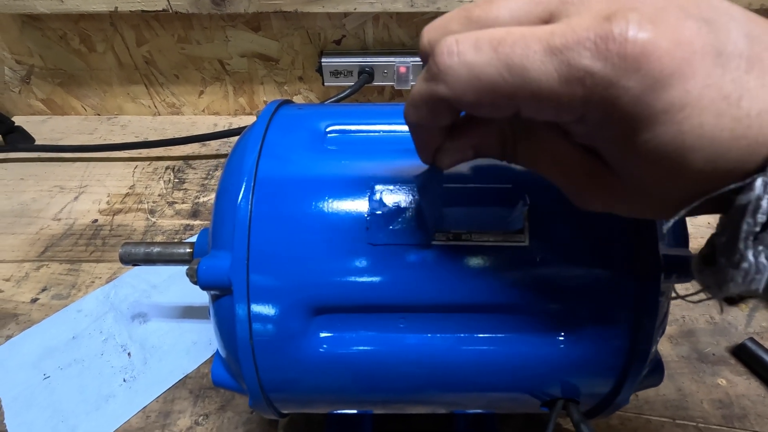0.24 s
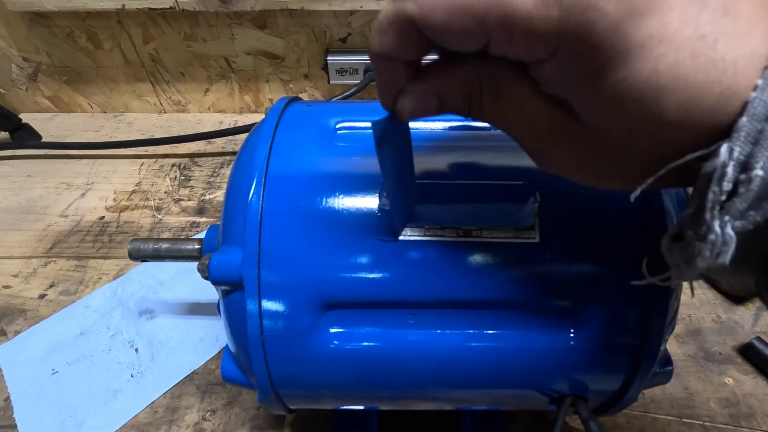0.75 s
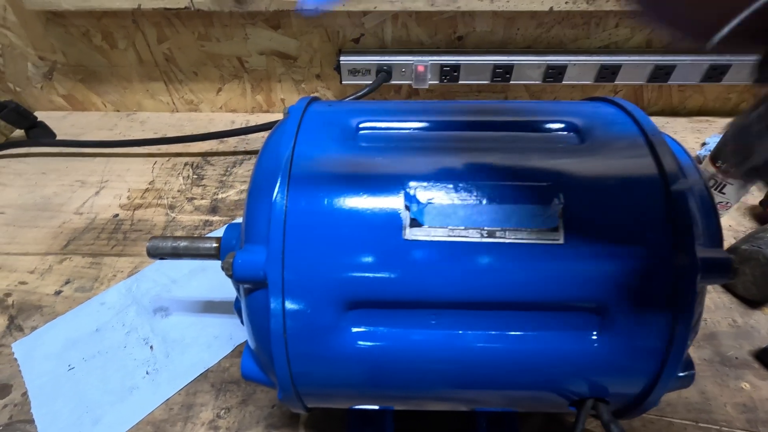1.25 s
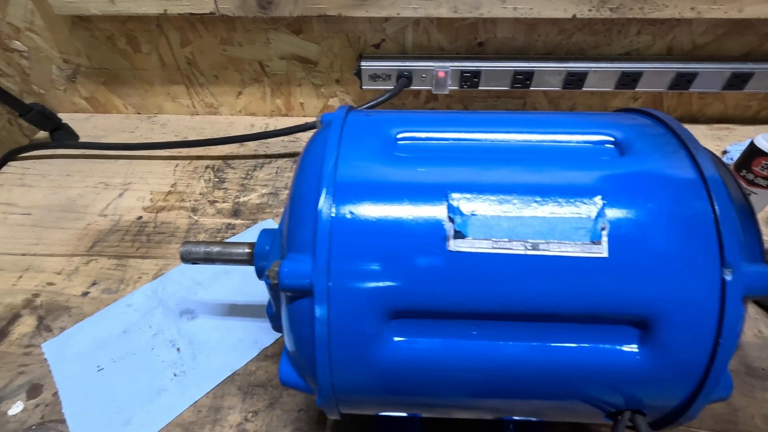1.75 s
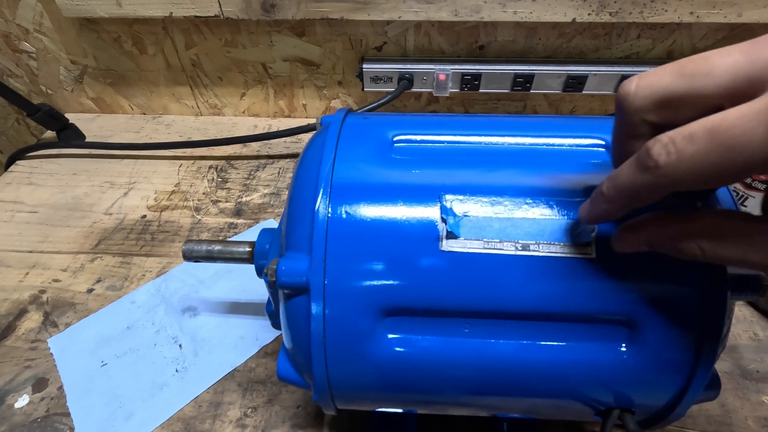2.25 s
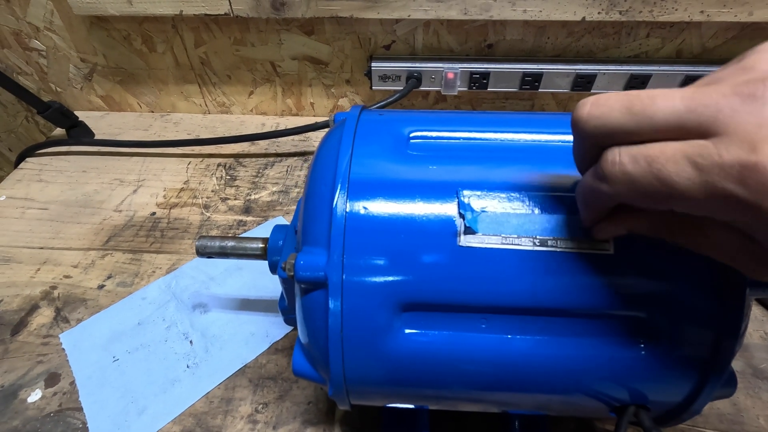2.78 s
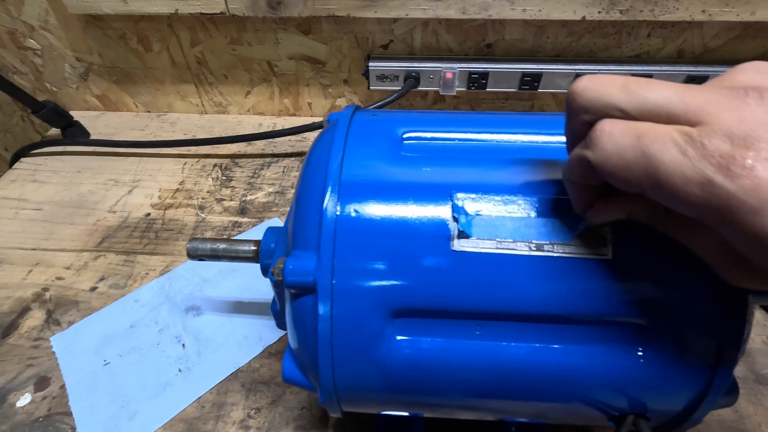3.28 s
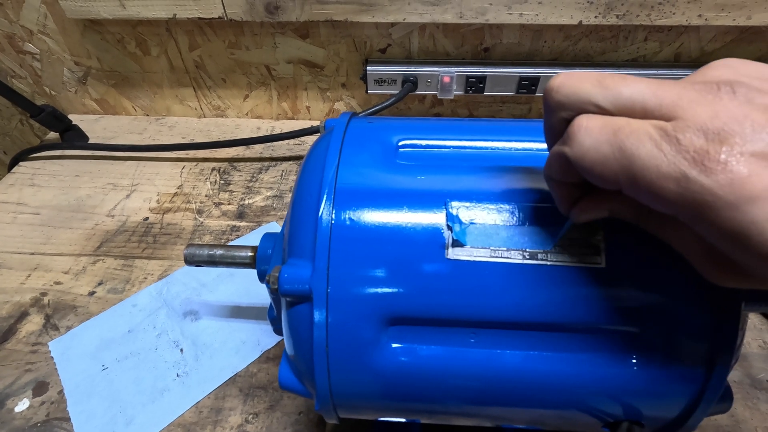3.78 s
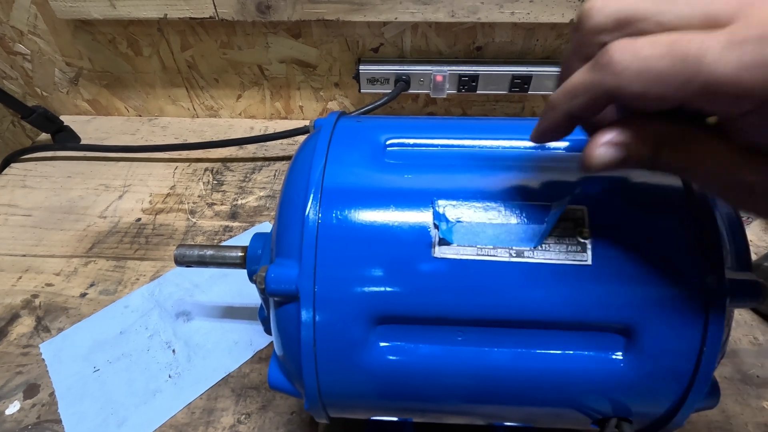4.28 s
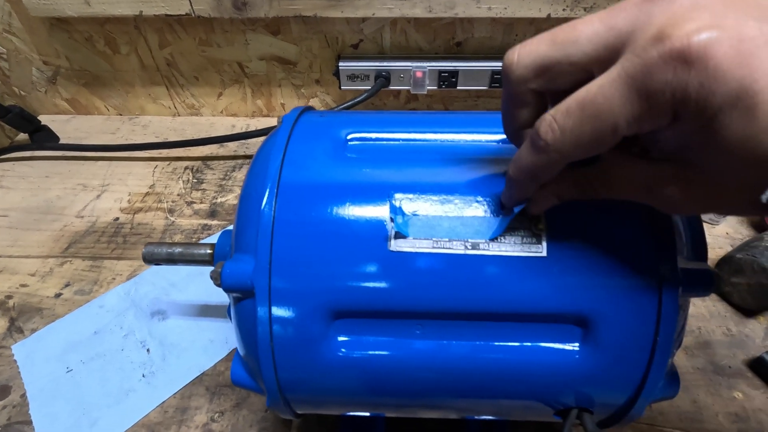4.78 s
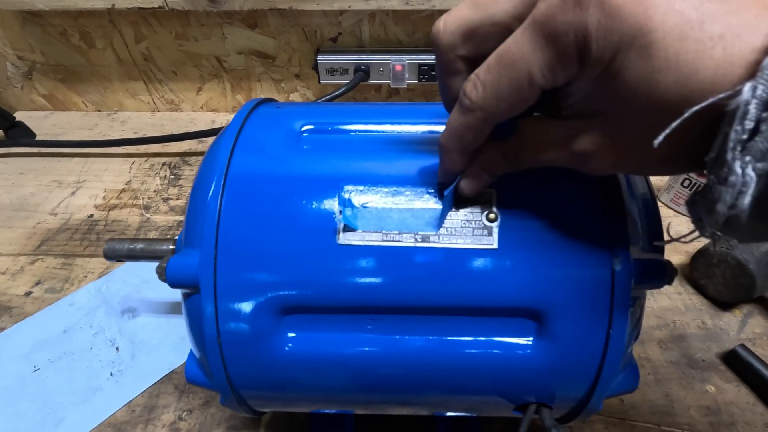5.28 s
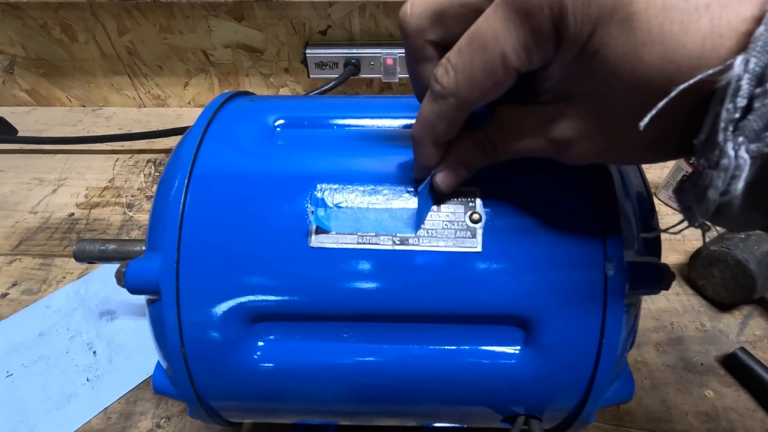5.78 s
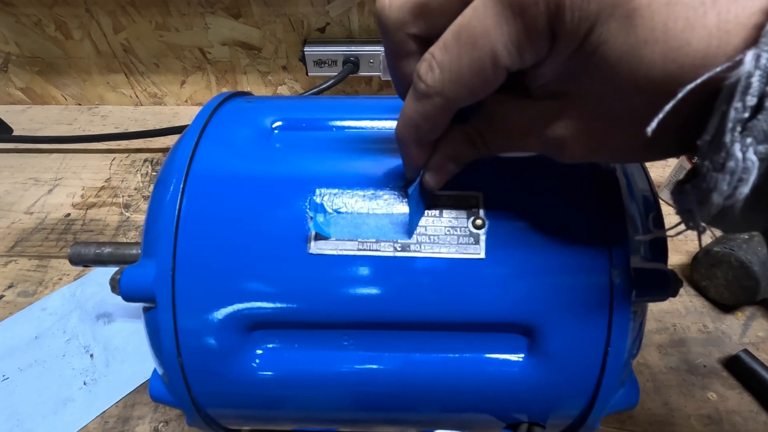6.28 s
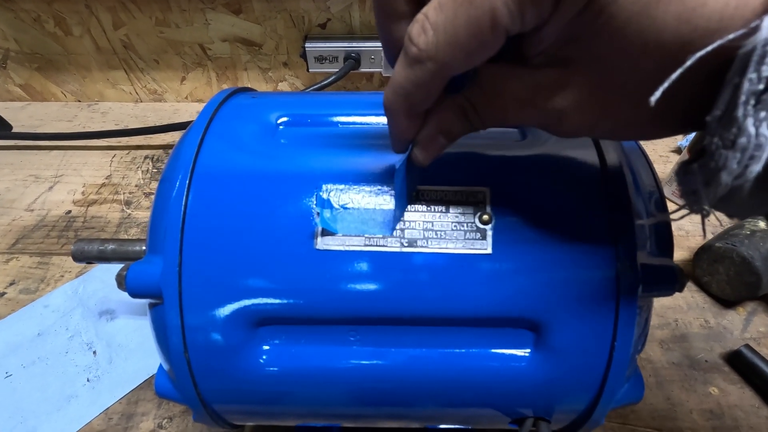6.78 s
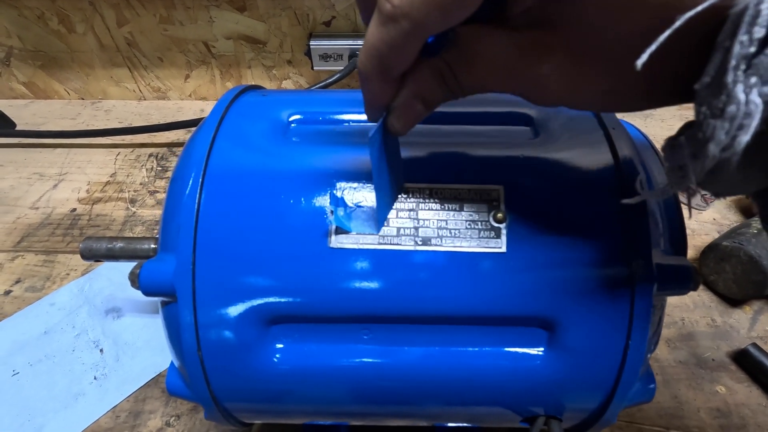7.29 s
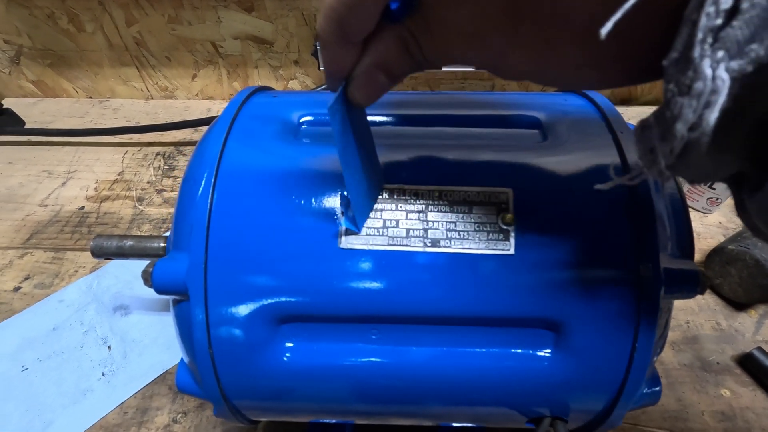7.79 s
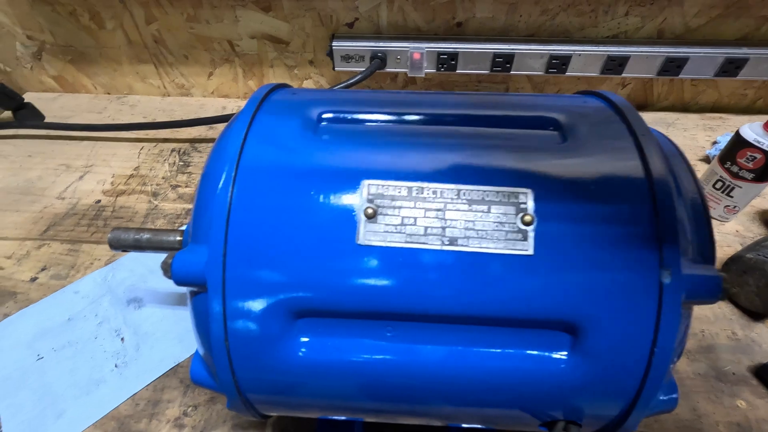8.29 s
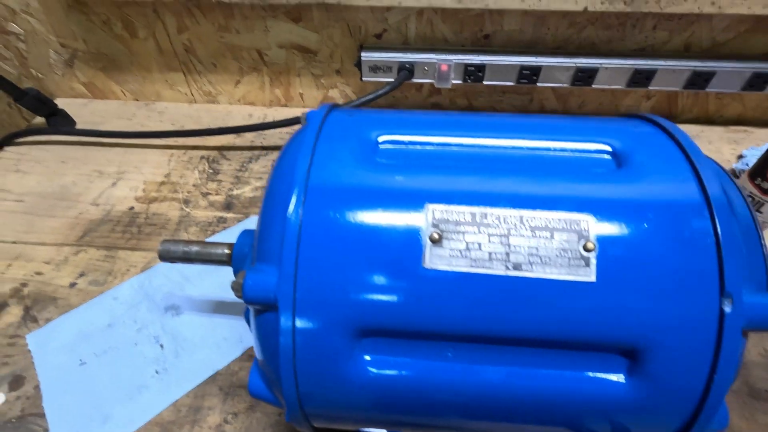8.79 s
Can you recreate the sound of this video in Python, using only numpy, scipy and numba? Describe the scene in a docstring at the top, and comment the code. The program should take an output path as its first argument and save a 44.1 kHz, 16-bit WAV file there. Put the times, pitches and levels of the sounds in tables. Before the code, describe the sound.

Masking tape is removed from a metal plate on a workbench, heard close and nearly without echo. A brief fizzy peel with snaps leads to papery rubbing, then quieter picking whose pitch falls, and a few ticks. A pause holds only soft room air and low hum. Then comes a longer, stronger tearing peel over a deep drone, finished by loud cracks and crisp crushing in the hand.

```python
"""Masking tape comes off a motor's metal nameplate on a workbench, close to the microphone, in a humming workshop.
First a short strip is peeled, snaps and is rubbed in the fingers; then a corner of the next is picked loose.
After a pause comes a long peel across the plate over a deep drone; it ends in snaps and a crumpling in the hand.
Random clicks of breaking glue ring the strip's moving resonances; snaps are cracks with short damped notes;
thuds are bending low notes; the workshop is coloured noise, a wavering hum and a rough drone."""
import sys
import numpy as np
from scipy import signal
from scipy.fft import rfft, irfft
from scipy.io import wavfile
from scipy.ndimage import uniform_filter1d, map_coordinates
from numba import njit

SR = 44100
rng = np.random.default_rng(int(sys.argv[2]) if len(sys.argv) > 2 else 0)


def file_out(sig):
    """Save sig as 16-bit WAV at sys.argv[1]."""
    # one column per channel
    cols = np.atleast_2d(sig).T
    # limit, then scale
    lim = np.clip(cols, -1, 1)
    pcm = np.round(lim * 32767).astype(np.int16)
    wavfile.write(sys.argv[1], SR, pcm)


N = 399105  # samples

# colour of one pop of glue: [f/Hz, level/dB]
POP_COLOUR = [(60, -27), (250, -1.5), (600, -3), (2500, 4.5), (5600, 2.5), (7200, -2), (8000, -8.5),
              (10000, -5.5), (11300, -6), (13000, -17), (14500, -36), (16000, -87)]
GLUE_POPS_PER_S = 2400  # in a steady peel

# courses of the three peels: [t/s, pull/dB, strip resonance f/Hz, ring/dB, upper resonance f/Hz]
# the first strip comes off
FIRST_PEEL = [(0, -44, 3000, 18, 6800), (.13, -45.5, 2970, 2, 6800), (.21, -47, 4400, 9, 6540),
              (.46, -44.5, 4250, 8.5, 6900), (.62, -55.5, 4030, -5, 7100), (.92, -48.5, 3380, 10, 5730),
              (1.05, -41, 3200, -9, 5400)]
# a corner of the next strip is picked loose; its resonance falls as it grows
PICKING = [(2.94, -60, 4400, 14, 5700), (3.13, -53.5, 4460, 14, 5200), (3.28, -58.5, 4050, 12, 4970),
           (3.48, -50, 3230, 6, 4450), (3.56, -47.5, 2900, 3, 4930), (3.69, -50, 2160, 8, 5400),
           (3.82, -52, 1430, -5, 5500), (3.92, -48.5, 1270, -17, 5500), (4.02, -47, 1190, -22, 5560)]
# the long peel across the plate
LONG_PEEL = [(6.09, -53, 3500, 6, 7700), (6.3, -49, 3700, 5, 8000), (6.68, -46.5, 3000, 4, 4730),
             (6.97, -44.5, 3800, 5, 4530), (7.48, -43.5, 3920, 8.5, 6700), (7.54, -49.5, 4200, 8, 6550),
             (8.03, -45, 3070, -29, 6700)]


def gain_of(db):
    """Amplitude factor of a level in dB."""
    return 10 ** (np.asarray(db) / 20)


def evened(x):
    """The sound scaled to an RMS of one."""
    return x / np.sqrt(np.mean(x ** 2) + 1e-20)


def read(points, hz):
    """A curve over frequency, read between its points on a logarithmic axis."""
    f, value = np.transpose(points)
    return np.interp(np.log(hz + 1), np.log(f + 1), value)


def follow(rows):
    """Every column of a curve over time, sample by sample."""
    s, *columns = np.transpose(rows)
    return [np.interp(np.arange(N) / SR, s, c) for c in columns]


def add(mix, s, sound):
    """Lays a sound into the mix from s seconds on."""
    part = mix[max(round(s * SR), 0):][:len(sound)]
    part += sound[:len(part)]


def drift(hz, size=N):
    """Smooth random wander of unit RMS, its changes fading out above hz."""
    f = np.fft.rfftfreq(size, 1 / SR)
    spectrum = rfft(rng.standard_normal(size))
    return evened(irfft(spectrum / (1 + (f / hz) ** 4), size))


def colour(x, points, size=2048):
    """A causal filter with the given spectrum, so that clicks keep their sharp front."""
    log_gain = np.log(gain_of(read(points, abs(np.fft.fftfreq(size, 1 / SR)))))
    minimum_phase = np.exp(np.conj(signal.hilbert(log_gain)))
    taps = np.fft.ifft(minimum_phase).real
    return signal.oaconvolve(x, taps)[:len(x)]


@njit
def two_pole(x, hz, damping):
    """A mass on a spring with moving tuning: the parts below, at and above its resonance."""
    out, s1, s2 = np.zeros((3, len(x))), 0., 0.
    for i in range(len(x)):
        g = np.tan(np.pi * hz[i] / SR)
        high = (x[i] - (damping + g) * s1 - s2) / (1 + g * (g + damping))
        band = g * high + s1
        low = g * band + s2
        s1, s2 = g * high + band, g * band + low
        out[0, i], out[1, i], out[2, i] = low, band, high
    return out


def away(t, start, end, rise_s, release_s):
    """Zero from start to end; outside, the number of rise or release times away."""
    return np.maximum(start - t, 0) / rise_s + np.maximum(t - end, 0) / release_s


def workshop(air_db=-57.5, air_swell_db=1.1, air_swell_hz=5, shaft_hz=28.4, waver=0.28,
             drone_hz=64, drone_damping=0.86):
    """Gently swelling coloured air, the wavering hum of a distant machine and a deep, rough drone."""
    # spectrum of the workshop air: [f/Hz, level per Hz/dB]
    air_colour = [(30, -22), (70, -6), (110, -5), (170, 6), (270, -1), (600, 1), (1200, -3), (2200, -8),
                  (4000, -12.5), (7000, -18), (8500, -31.5), (12000, -28.5), (15000, -74)]
    # partials of the hum: [multiple of the shaft speed, level/dB]
    hum_partials = [(3, -10.5), (4, -2), (5, 8)]
    # swell of the hum: [t/s, level/dB]
    hum_level = [(0, -70.5), (3.7, -68), (4.2, -59.5), (5.1, -66.5), (5.32, -58), (5.85, -64.5),
                 (6.15, -69.5), (9.05, -67.5)]
    # drone that swells under the long peel: [t/s, level/dB]
    drone_level = [(5.7, -91), (6.2, -72), (7.75, -65), (8, -80)]
    hiss = evened(colour(rng.standard_normal(N), air_colour))
    air = gain_of(air_db + air_swell_db * drift(air_swell_hz)) * hiss
    turns = np.cumsum(shaft_hz * (1 + 0.0091 * drift(hz=3.4))) / SR
    hum = np.zeros(N)
    for multiple, db in hum_partials:
        hum += gain_of(db) * (1 + waver * drift(hz=5.8)) * np.sin(2 * np.pi * multiple * turns)
    drone = evened(two_pole(drift(hz=2 * drone_hz), np.full(N, float(drone_hz)), drone_damping)[2])
    return air + gain_of(follow(hum_level)[0]) * evened(hum) + gain_of(follow(drone_level)[0]) * drone


def room(x, gap_s=0.005):
    """Scattered echoes from bench and walls, each band dying at its own speed."""
    # time for the echoes to fall by 60 dB: [f/Hz, t60/s]
    decay = [(3000, 0.081), (14000, 0.025)]
    hz, t, z = signal.stft(rng.standard_normal(SR // 2), SR, nperseg=256)
    fading = z * gain_of(-60 * t / read(decay, hz)[:, None])
    tail = signal.istft(fading, SR, nperseg=256)[1]
    tail *= 1 - np.exp(-(np.arange(len(tail)) / SR / gap_s) ** 2)  # the echoes build up gradually
    return signal.fftconvolve(x, tail / np.linalg.norm(tail))[:N]


def thuds(knock_s=0.055, sag=0.206, rise_share=0.029, lowest_hz=150):
    """Low notes that bend with the tension; the shorter they are, the more they turn into a broad knock."""
    # jerks and finger bumps that drum the taut tape and the housing: [t/s, level/dB, f/Hz, t60/s]
    bumps = [(.752, -49, 260, .5), (.803, -38, 265, 0.2), (.874, -35, 242, 0.13), (1.058, -35, 224, 0.094),
             (1.682, -43, 260, 0.084), (2.035, -37, 260, 0.042), (2.045, -49.5, 302, 0.5),
             (4.204, -44, 247, 0.052), (8.037, -39.5, 310, 0.12), (8.066, -31.5, 310, 0.053),
             (8.257, -35.5, 290, 0.036), (8.593, -38.5, 393, 0.2), (8.612, -35.5, 293, 0.13),
             (8.69, -38, 260, 0.11), (8.742, -41, 290, 0.095), (9.022, -39.5, 272, 0.1)]
    out, t = np.zeros(N), np.arange(SR // 2) / SR
    for s, db, hz, t60 in bumps:
        pitch = hz * np.exp(-sag * np.minimum(t / t60, 1))
        rough = min((knock_s / t60) ** 0.87, 1)
        knock = evened(two_pole(rng.standard_normal(len(t)), pitch, rough)[1])
        tone = np.sin(2 * np.pi * np.cumsum(pitch) / SR)
        note = np.sqrt(1 - rough) * tone + np.sqrt(rough) * knock
        add(out, s, gain_of(db - 60 * t / t60) * (1 - np.exp(-t / (rise_share * t60))) * note)
    # too small a surface to move deep bass
    return signal.sosfilt(signal.butter(4, lowest_hz, "high", fs=SR, output="sos"), out)


def pops(per_s, spread_db, top):
    """Clicks at random moments: many small, a few large."""
    n = len(per_s)
    size = gain_of(spread_db * np.minimum(rng.exponential(1, n), top)) / np.sqrt(per_s)
    struck = rng.choice([-1., 1.], n) * (rng.random(n) < per_s / SR)
    return evened(size * struck)


def crackle(pull_db, full_per_s, hz, ring_db, body_db, sparkle_db, upper_hz, fizz_db,
            clump_db=2.5, sparkle_hz=7200, damping=0.96, ring_damping=0.14, upper_db=-5, upper_damping=0.44):
    """Threads of glue break in clumps and ring the free strip at its moving resonance."""
    n = len(pull_db)
    # gentle picking breaks the threads one by one
    per_s = full_per_s * gain_of(np.clip(pull_db + 44.5, -26, 0)) ** 1.3
    clumps = gain_of(clump_db * drift(hz=113, size=n))

    def breaking():
        """Pops over a smooth fizz, coloured like glue letting go."""
        fizz = gain_of(fizz_db) * rng.standard_normal(n)
        return colour(clumps * (pops(per_s, spread_db=2.5, top=4.1) + fizz), POP_COLOUR)

    drive, under = breaking(), breaking()
    # the strip hardly radiates below its resonance
    sheet = two_pole(two_pole(drive, hz, damping)[2], hz, damping)[2]
    ring = gain_of(ring_db) * ring_damping * two_pole(drive, hz, ring_damping)[1]
    upper = gain_of(upper_db) * upper_damping * two_pole(sheet, upper_hz * np.ones(n), upper_damping)[1]
    body = gain_of(body_db) * two_pole(under, hz, np.sqrt(2))[0]  # the duller rasp of what lies beneath
    strip = sheet - ring + upper + body
    dull = signal.sosfiltfilt(signal.butter(3, min(sparkle_hz, SR / 3), fs=SR, output="sos"), strip)
    strip = dull + gain_of(sparkle_db) * (strip - dull)
    power = uniform_filter1d(strip ** 2, size=2600)  # the pull sets how much energy is set free
    return gain_of(pull_db) * strip / np.sqrt(abs(power) + 1e-12)


def rustles(upper_hz=5400, base_fizz_db=7.5, stiffen_octaves=0.14):
    """Each squeeze of loose tape swells and dies; stiffening lifts its resonance, dense pops blur into fizz."""
    # fingers rub, crease or crush the loose tape; rise and release span 20 dB:
    # [peak t/s, level/dB, rise/s, release/s, resonance f/Hz, ring/dB, body/dB, sparkle/dB, pops per s]
    squeezes = [(.77, -42, 0.1, 0.18, 3480, 19.5, 12.5, 12.5, 790),
                (0.886, -36.5, 0.021, 0.043, 3530, -6, 1, 9, 3400),
                (1.063, -43.5, 0.1, 0.027, 3180, -9, -5, 5, 1700),
                (1.29, -49.5, 0.22, 0.51, 2710, -26, 6, -1, 4200),
                (1.59, -41.5, 0.065, 0.11, 2200, 9, 0, 5, 540),
                (1.74, -39, 0.061, 0.047, 2220, 26, -6, 14, 660),
                (1.871, -35, 0.09, 0.12, 2980, 19, -4, 7.5, 1050),
                (2.025, -45.5, 0.14, 0.14, 2760, 7, 7, -1, 3500),
                (3.0, -48.5, 0.18, 0.1, 4100, 11, 10.5, 10, 1800),
                (4.212, -42, 0.043, 0.035, 890, -4, 22, 5, 2700),
                (4.24, -54.5, 0.039, 0.27, 2500, 17, 17, 4, 5000),
                (4.36, -41, 0.03, 0.019, 2720, 5, 8, 7.5, 2000),
                (4.455, -49, 0.064, 0.17, 2480, 17, 9, 11, 890),
                (8.06, -36.5, 0.055, 0.081, 2730, -23, 2, 2, 2400),
                (8.29, -45, 0.19, 0.27, 2300, -24, 8, -0.5, 3600),
                (8.447, -31.5, 0.023, 0.066, 3740, 6, 1, 7, 6100),
                (8.54, -38, 0.062, 0.071, 3050, 5, 3, 1, 4400),
                (8.598, -26, 0.033, 0.057, 2700, 3, 1, -4, 1600),
                (8.689, -26.5, 0.012, 0.031, 3860, 17, 11.5, 8, 1400),
                (8.811, -30, 0.14, 0.052, 2310, -7, -6, -3.5, 3100),
                (8.861, -48, 0.11, 0.4, 2400, -2, 7.5, -6, 3000),
                (9.04, -34.5, 0.078, 0.14, 2880, 2, -4, -4, 1800)]
    out, t = np.zeros(N), np.arange(-SR // 2, SR // 2) / SR
    for s, db, rise_s, release_s, hz, ring_db, body_db, sparkle_db, per_s in squeezes:
        pull_db = db - 20 * away(t, 0, 0, rise_s, release_s)
        pitch = hz * 2 ** (stiffen_octaves * np.tanh(2 * t / (rise_s + release_s)))
        fizz_db = base_fizz_db + 20 * np.log10(per_s / GLUE_POPS_PER_S)
        add(out, s + t[0], crackle(pull_db, per_s, pitch, ring_db, body_db, sparkle_db, upper_hz, fizz_db))
    return out


def snap(hz, crack_db, cycles=1.53, overtone=1.75, overtone_db=-9, front_s=.00012, crack_s=0.0014,
         rattle_s=0.00059, rattle_db=-12):
    """The strip jerks free: a crack, a few cycles of its resonance and an overtone, and a brief flutter."""
    # colour of the crack: [f/Hz, level/dB]
    crack_colour = [(100, -10), (400, -8), (1200, -6.5), (3000, 10), (5200, 7.5), (7200, 2), (8300, -4.5),
                    (11000, -8), (13500, -25), (16000, -48)]
    t = np.arange(1400) / SR
    tear, flutter = rng.standard_normal((2, len(t)))

    def damped(f):
        """A note that swells and dies within a few cycles."""
        return evened(np.sin(2 * np.pi * f * t) * np.exp(-t * f / cycles) * (1 - np.exp(-t * f)))

    ring = evened(colour(damped(hz) - gain_of(overtone_db) * damped(hz * overtone), POP_COLOUR))
    burst = evened(t == 0) + 1.9 * evened(tear * np.exp(-t / crack_s))  # one click, then tearing noise
    crack = evened(colour(burst, crack_colour) * (1 - np.exp(-t / front_s)))
    jerk = ring + gain_of(crack_db) * crack
    flutter *= np.exp(-t / rattle_s) * (1 - np.exp(-t / crack_s))
    rattle = signal.fftconvolve(jerk, flutter)[:len(t)]
    jerk = evened(jerk) + gain_of(rattle_db) * evened(rattle)
    return jerk * np.sqrt(0.0034 * SR / np.sum(jerk ** 2))  # level over the first few ms


def snaps(rebound_s=.004, rebound_db=-13, rebound_crack_db=-4):
    """Each snap is followed at once by its weaker rebound as the strip whips back."""
    # sudden snaps and buckles of the tape: [t/s, level/dB, resonance f/Hz, bright crack/dB]
    jerks = [(.059, -34, 3280, 9), (0.1066, -24, 2900, -5.5), (0.143, -35, 3040, -2),
             (0.3724, -33, 6400, -9.5), (0.871, -21, 2650, 7), (0.8761, -25.5, 860, 11),
             (1.0047, -37, 3640, -2), (1.0293, -26, 5700, -2), (1.056, -21, 3500, -1),
             (1.0607, -22.5, 3280, -4), (1.6232, -36, 2460, 0), (1.6621, -25, 2400, -11),
             (1.6826, -33, 2820, -3), (1.752, -24.5, 2550, 0), (1.7548, -25, 2550, -4),
             (1.7799, -33.5, 5600, -13), (2.036, -29, 2830, 8.5), (2.1987, -46, 2480, 6),
             (2.5629, -56, 6940, -10), (2.7856, -45.5, 5770, -2), (2.882, -44.5, 2700, 0),
             (2.9548, -41.5, 6200, 3), (4.0803, -42.5, 2700, -5), (4.1462, -40.5, 1700, 1),
             (4.187, -41, 1590, -5), (4.2054, -45, 1700, 15), (4.214, -37.5, 2020, 11),
             (4.3412, -51, 2600, 4), (4.367, -42, 2650, -6), (4.4436, -30.5, 7500, -20),
             (4.4453, -27, 2460, -3), (4.724, -55.5, 7000, -3), (7.8807, -16.5, 2250, 2),
             (8.0342, -19.5, 4800, 18), (8.062, -25, 4700, 13), (8.0682, -16.5, 2790, -2),
             (8.0697, -13.5, 5430, -3.5), (8.0701, -29, 766, 2), (8.2362, -27.5, 6300, -11),
             (8.2572, -30, 2230, -4), (8.3033, -27, 1780, 4), (8.5871, -30, 3100, 19),
             (8.6886, -22.5, 5060, 5), (8.742, -23, 2570, 1), (8.8129, -15.5, 3600, 1),
             (8.8167, -21.5, 2970, 2), (8.8204, -20, 2400, -6), (8.8357, -25.5, 2400, -3),
             (8.9634, -35.5, 2640, 2)]
    out = np.zeros(N)
    for s, db, hz, crack_db in jerks:
        add(out, s, gain_of(db) * snap(hz, crack_db))
        add(out, s + rebound_s, gain_of(db + rebound_db) * snap(hz, rebound_crack_db))
    return two_pole(out, np.full(N, 160.), 1)[2]  # the snaps carry no deep bass


def ribbon(damping=0.31, pops_per_s=2500):
    """The pops of the long peel shake the whole freed length, a taut ribbon, at its lowest note."""
    # the note sinks as the ribbon lengthens: [t/s, level/dB, f/Hz]
    lowest_note = [(6.05, -77, 2400), (6.22, -54.5, 1900), (6.58, -59.5, 1470), (7.0, -61, 750),
                   (7.45, -63.5, 510), (7.95, -60.5, 310), (8.1, -66, 303)]
    db, hz = follow(lowest_note)
    drive = pops(np.full(N, float(pops_per_s)), spread_db=7.5, top=2.95)
    return gain_of(db) * evened(two_pole(drive, hz, damping)[1] / np.sqrt(hz))


def plate(x, level_db):
    """The plate and the hollow of the hand lend the peel fixed resonances; the loudness stays the same."""
    # resonances of the plate and the hand above it: [f/Hz, width/Hz, level/dB]
    resonances = [(2100, 700, -7), (4150, 300, -8), (4900, 200, -4), (5330, 240, -4), (5830, 200, -9),
                  (6900, 450, -1)]
    rung = x.copy()
    for hz, width, db in resonances:
        rung += gain_of(level_db + db) * signal.lfilter(*signal.iirpeak(hz, hz / width, SR), x)
    return rung * np.std(x) / np.std(rung)


def hand(x, echo_s=.0011, sway=0.205, sway_hz=6.2, echo_db=-9):
    """An echo off the moving hand lays shifting bands over the peel; sway is a share of the delay."""
    delay_s = echo_s * (1 + sway * drift(sway_hz, size=len(x)))
    echo = map_coordinates(x, [np.arange(len(x)) - delay_s * SR])
    return (x + gain_of(echo_db) * echo) / np.hypot(1, gain_of(echo_db))


def peels(uneven_db=1.0, uneven_hz=24, clump_db=1.0, rise_s=0.064, release_s=0.11,
          tug_rise_s=0.0094, tug_release_s=0.026):
    """Each strip is drawn off in one pull; the glue holds, gives way with a sudden tug, and settles again."""
    # each peel: [course, body below the resonance/dB, sparkle/dB, smooth fizz under the pops/dB, plate ring/dB]
    strips = [(FIRST_PEEL, -2.5, 0, -8, -7), (PICKING, -4.5, 0, -2, -9), (LONG_PEEL, -0.4, -3.5, -8, 0)]
    # tugs, where the glue gives way faster for a moment: [t/s, extra pull/dB]
    tugs = [(3.168, 4), (3.485, 3.5), (3.684, 7), (6.202, 9.5), (6.311, 4), (6.519, 6), (6.621, 7.5),
            (6.664, 8.5), (6.93, 4), (6.98, 6.5), (7.09, 2), (7.262, 7), (7.307, 4), (7.451, 4.5),
            (7.486, 7), (7.905, 9.5)]
    out = np.zeros(N)
    for course, body_db, sparkle_db, fizz_db, plate_db in strips:
        s, *columns = np.transpose(course)
        t = max(s[0] - .5, 0) + np.arange(3 * SR) / SR
        pull_db, hz, ring_db, upper_hz = (np.interp(t, s, c) for c in columns)
        pull_db += uneven_db * drift(uneven_hz, size=len(t))
        pull_db -= 20 * away(t, s[0], s[-1], rise_s, release_s)  # 20 dB per rise or release time
        for at, db in tugs:
            pull_db += db * np.exp(-away(t, at, at, tug_rise_s, tug_release_s) ** 2)
        strip = crackle(pull_db, GLUE_POPS_PER_S, hz, ring_db, body_db, sparkle_db, upper_hz, fizz_db,
                        clump_db=clump_db)
        add(out, t[0], plate(hand(strip), plate_db))
    return out


def scene(wet_db=-23, side_db=-20):
    """Everything lies straight ahead; the echoes, chiefly the highest, differ between the ears."""
    tape = peels() + ribbon() + rustles() + snaps() + thuds()
    mid = tape + gain_of(wet_db) * room(tape) + workshop()
    side = gain_of(side_db) * colour(room(mid), [(3000, -37), (7500, -23.0), (12500, 20.0)])
    return np.array([mid + side, mid - side])


def record(dry, notch_hz=9050, notch_q=6, edge_hz=15500):
    """The microphone port cancels one narrow treble band; then a low-pass sets the upper band limit."""
    ported = signal.lfilter(*signal.iirnotch(notch_hz, notch_q, SR), dry)
    band_limit = signal.firwin(511, edge_hz, window=("kaiser", 9), fs=SR)
    return signal.oaconvolve(ported, band_limit[None], "same")


dry = scene()
out = record(dry)
file_out(out)
```